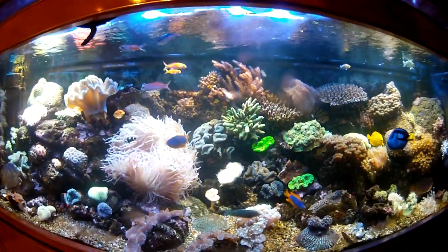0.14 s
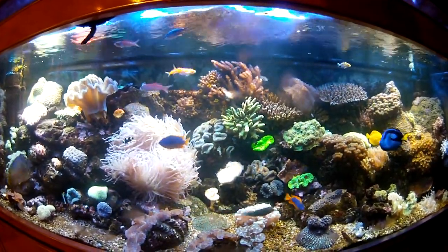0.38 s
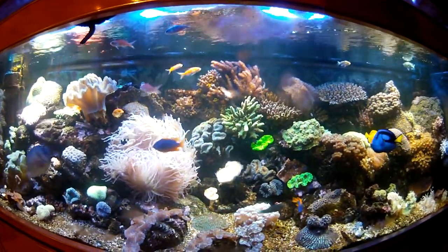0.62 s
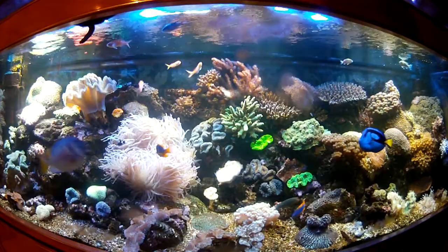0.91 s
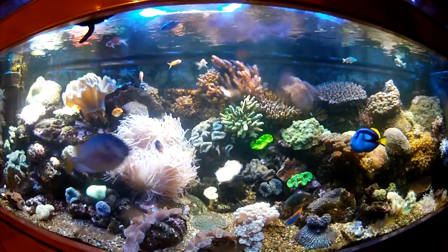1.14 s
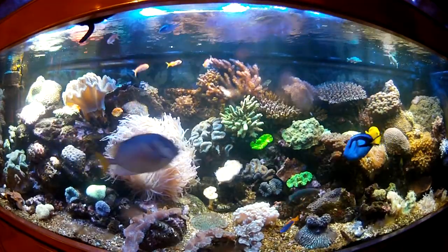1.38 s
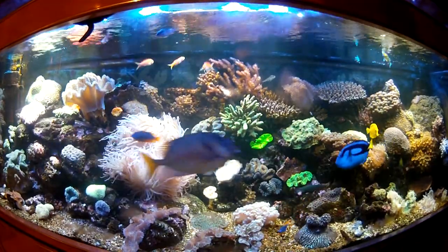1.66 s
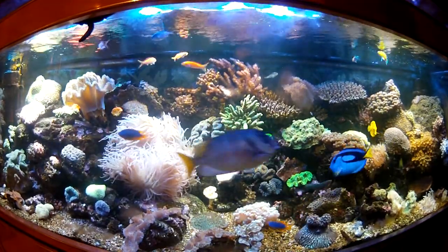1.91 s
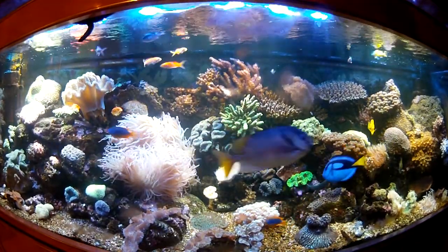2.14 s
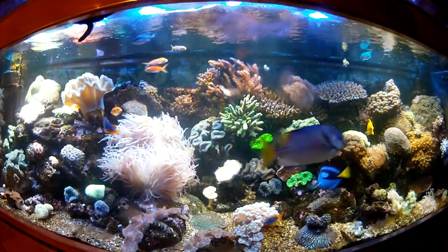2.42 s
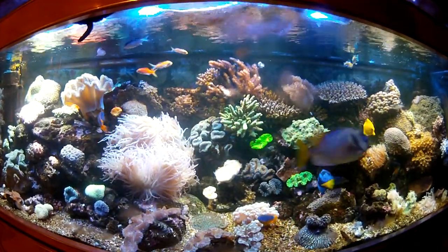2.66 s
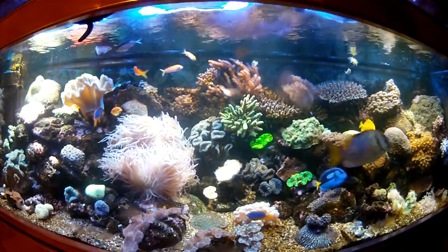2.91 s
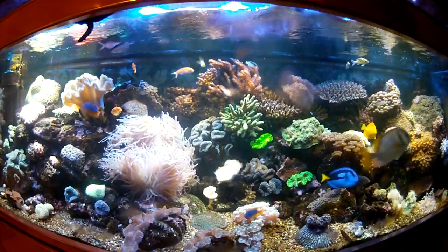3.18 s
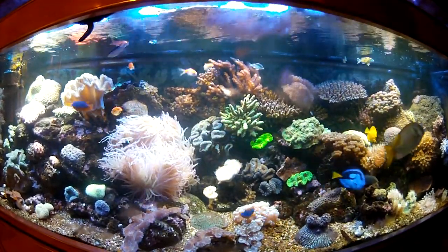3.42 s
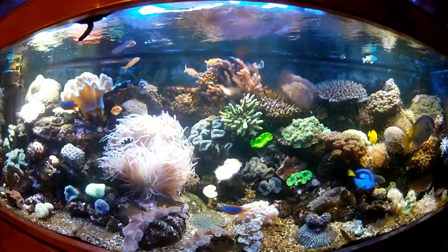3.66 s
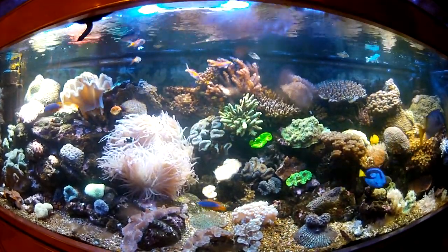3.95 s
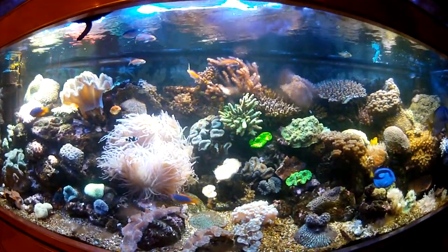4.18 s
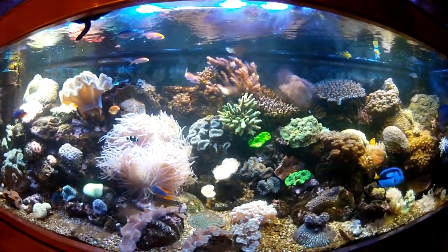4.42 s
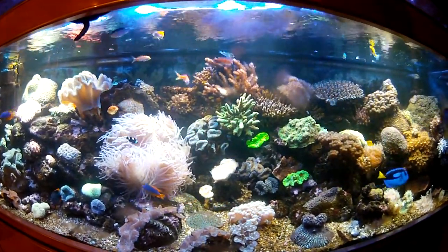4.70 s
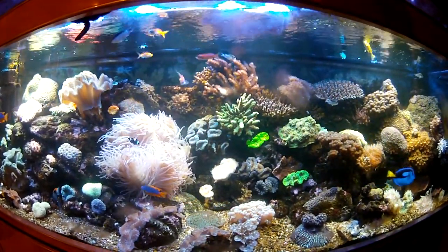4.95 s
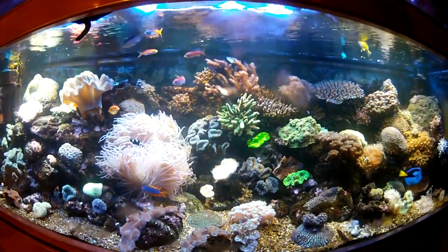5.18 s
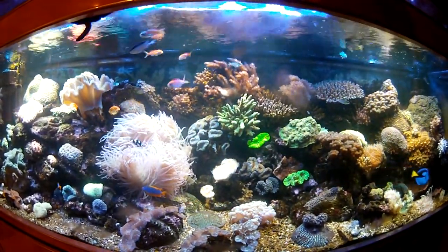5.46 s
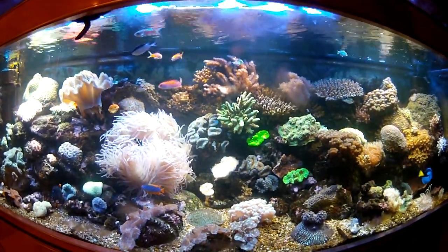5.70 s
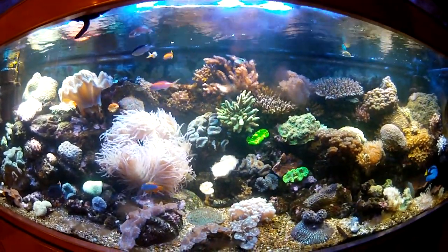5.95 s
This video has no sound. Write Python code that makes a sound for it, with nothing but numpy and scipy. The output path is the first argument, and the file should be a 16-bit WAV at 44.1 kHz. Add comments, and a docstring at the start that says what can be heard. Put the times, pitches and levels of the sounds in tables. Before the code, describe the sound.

A quiet indoor room with a large reef tank. Throughout, mains motors hum on steady low tones, with thin faint whines, a soft hiss of water flow and slow, deep room rumble. A slower wave pump drones first; at about 0.4 s it swaps within a tenth of a second to a pump with a strong low buzz near 143 Hz. Around 3.1 s the slower pump returns, its strongest tone near 246 Hz. Fish pass silently. From about 4.5 s a hand disturbs the camera: a low heave, then rumble, rustle and muffled knocks from 4.8 s, with a strong thump near 4.9 s. It eases around 5.2 s, then resumes from 5.4 s to the end at about 6.1 s with close, bassy lurches, dense dull knocks and tiny plastic ticks. The pumps swap again near 5.8 s, mostly covered. Mono, close, coarse small-camera sound with slightly gritty mirrored treble.

```python
"""A quiet room with a reef tank: mains motors hum, water flows, and two wave pumps take turns running.
Steady sines make the motors and pumps; shaped noise makes the water, the whines and the room rumble.
In the last two seconds a hand shifts the small camera: its body rumbles, rustles, heaves, knocks and ticks.
The camera samples its microphone coarsely and holds each sample, so the bass is mirrored in the treble."""
import sys
import numpy as np
from scipy import signal
from scipy.fft import rfft, irfft, next_fast_len
from scipy.io import wavfile

SR = 44100
rng = np.random.default_rng(int(sys.argv[2]) if len(sys.argv) > 2 else 0)


def master(y):
    """Save y as 16-bit WAV."""
    cut = np.clip(np.atleast_2d(y).T, -1, 1)
    pcm = np.round(cut * 32767)  # scale
    wavfile.write(sys.argv[1], SR, pcm.astype(np.int16))


def linear_from_db(decibels):
    """Turn decibels (scalar or array-like) into linear amplitude factors; 0 gives 1."""
    return 10 ** (np.asarray(decibels, float) / 20)


N = 268069  # length of the scene in samples


def drift(rate_hz):
    """A random curve of spread 1 that moves mostly slower than rate_hz."""
    # Made at every 40th sample; the first 2000 values let the filter settle.
    pole = np.exp(-80 * np.pi * rate_hz / SR)
    white = rng.standard_normal(N // 40 + 2002)
    slow = signal.lfilter([1], [1, -2 * pole, pole * pole], white)[2000:]
    return np.interp(np.arange(N) / 40, np.arange(len(slow)), slow / slow.std())


def noise(gain_at):
    """Noise of rms 1 whose gain is a given function of frequency."""
    size = next_fast_len(N)
    hz = np.arange(size // 2 + 1) * SR / size + 1  # the 1 avoids dividing by zero
    spectrum = rfft(rng.standard_normal(size)) * gain_at(hz)
    x = irfft(spectrum, size)[:N]
    return x / x.std()


def coloured(spectrum):
    """Noise of rms 1 with a tabled spectrum, joined by straight lines over log frequency."""
    hz, db = np.transpose(spectrum)
    return noise(lambda f: linear_from_db(np.interp(np.log(f), np.log(hz), db)))


def tones(lines, waver_db):
    """Sines whose level wavers slowly as load and water move."""
    t = np.arange(N) / SR
    out = np.zeros(N)
    for hz, db in lines:
        level = np.sqrt(2) * linear_from_db(db + waver_db * drift(2.6))  # root 2 turns rms into peak
        out += level * np.sin(2 * np.pi * (hz * t + rng.random()))
    return out


def room_rumble(corner_hz, fall):
    """The building and stand rumble in slow swells: deep noise that peaks near the lowest room modes."""
    swell_db = -51 + 1.5 * drift(4.3)
    return linear_from_db(swell_db) * noise(lambda f: (f / corner_hz) ** 2 / (1 + (f / corner_hz) ** fall))


def water_flow():
    """Water flow, room air and microphone hiss: broad noise whose level drifts gently."""
    # Loudness along the spectrum, relative: pitch_hz, level_db (per Hz)
    flow_spectrum = [(60, -34.5), (110, -1), (165, -16), (292, -7.5), (318, -16), (370, -8.5), (720, -10.5),
                     (790, -14.5), (985, -20.5), (1080, -17.5), (1240, -18), (1290, -24), (4900, -31.5),
                     (6000, -36)]
    level_db = -56.5 + .5 * drift(1.3)
    return linear_from_db(level_db) * coloured(flow_spectrum)


def motor_hum():
    """Steady motors and a filter pump sound as sines, some at multiples of the mains frequency."""
    # Motor tones: pitch_hz, level_db (rms)
    hum_tones = [(50, -62), (100.05, -60), (150, -72), (200.1, -61), (300.1, -60.5), (350.2, -77),
                 (500.2, -72), (506.8, -72.5), (522.1, -71), (559.2, -66.5), (596.7, -75), (668.6, -76),
                 (709.6, -79)]
    return tones(hum_tones, waver_db=.6)


def whines():
    """Fans and impellers whine: noise passes through narrow resonances."""
    # Whines: pitch_hz, width_hz (between the half-gain points), level_db (rms)
    whine_bands = [(402, 5, -69), (694, 5, -76), (918, 20, -81), (1027, 10, -77), (1134, 10, -78),
                   (1226, 8, -84), (1243, 8, -83), (1340, 6, -87)]
    out = np.zeros(N)
    for hz, width, db in whine_bands:
        out += linear_from_db(db) * noise(lambda f: 1 / (1 + (2 * (f - hz) / width) ** 2))
    return out


def wave_pumps(waver_db):
    """Two pumps, each a set of sines, swap over: one runs down while the other starts."""
    # Tones of each pump while it runs: pitch_hz, level_db (rms)
    fast_tones = [(143.1, -51), (243.1, -68), (286.2, -64), (428.8, -73), (695, -71.5)]
    slow_tones = [(122.8, -66), (245.9, -54.5), (368.8, -62.5), (691, -74), (737.4, -76)]
    # Middle of each swap, the slow pump running first: time_s
    swap_times = [.42, 3.135, 5.84]
    swap_s = 0.085  # length of each swap
    t = np.arange(N) / SR
    fast_on = np.zeros(N)
    for k, s in enumerate(swap_times):
        fast_on += (-1) ** k * np.clip((t - s) / swap_s + .5, 0, 1)
    return fast_on * tones(fast_tones, waver_db) + (1 - fast_on) * tones(slow_tones, waver_db)


def grip_rumble(grip_db):
    """The grip shakes the camera body: lumpy deep noise that follows the hand."""
    # Loudness along the spectrum, relative: pitch_hz, level_db (per Hz)
    rumble_spectrum = [(15, -32), (25, 0), (80, -6.5), (238, -23), (509, -33.5), (659, -38), (1200, -50),
                       (1560, -72), (2640, -120)]
    return linear_from_db(grip_db + 2.5 * drift(15)) * coloured(rumble_spectrum)


def skin_rustle(grip_db):
    """Skin rustles on the case: faint, quickly flickering noise that follows the hand."""
    low_hz, high_hz = 900, 4500
    level_db = grip_db - 44 + 6.5 * drift(27)
    return linear_from_db(level_db) * noise(lambda f: 1 / (1 + (low_hz / f) ** 2 + (f / high_hz) ** 2))


def heaves():
    """The mount swings unevenly and lopsidedly under a bell envelope for each heave."""
    # Heaves of the camera body on its mount: middle_s, peak_db, length_ms (between half-height points)
    heave_events = [(4.517, -27, 17.6), (4.771, -29, 61), (4.9027, -33, 14), (5.062, -36, 24),
                    (5.374, -39, 24), (5.505, -26, 23), (5.598, -27.5, 79), (5.667, -23.5, 14),
                    (5.712, -18, 24), (5.767, -20, 40), (5.835, -26, 34), (5.907, -20.5, 23),
                    (6.008, -27, 23), (6.047, -21.5, 5.8), (6.076, -18, 7.6)]
    mount_hz, wobble, overtone_db = 51.54, 0.2, -10  # wobble: unsteady share of the pitch
    t = np.arange(N) / SR
    envelope = np.zeros(N)
    for s, db, ms in heave_events:
        envelope += linear_from_db(db) * 2 ** (-((t - s) * 2000 / ms) ** 2)
    phase = 2 * np.pi * np.cumsum(mount_hz * np.exp(wobble * drift(25.26))) / SR
    # An overtone at twice the pitch makes the swing lopsided.
    overtone = linear_from_db(overtone_db + 2.3 * drift(22)) * np.cos(2 * phase + 2 * drift(14))
    return envelope * (np.cos(phase) + overtone)


def knocks(spread, rise_cycles):
    """A bending wave runs through the case: highs arrive first, so the pitch falls within each knock."""
    # Dull knocks on the case: start_s, level_db (before rise, decay and dulling), first_pitch_hz
    knock_events = [(4.782, -28, 282), (4.8317, -31.5, 390), (4.882, -33, 354), (4.9395, -15, 335),
                    (5.4596, -18.5, 217), (5.485, -22, 276), (5.606, -17, 346), (5.6852, -24.5, 414),
                    (5.6872, -15.5, 360), (5.721, -30.5, 300), (5.7381, -23, 560), (5.742, -20.5, 323),
                    (5.8028, -18.5, 213), (5.95, -23.5, 287), (5.961, -20.5, 257), (6.0213, -20.5, 350),
                    (6.0321, -16.5, 206)]
    decay_s = 0.006
    softness = 3.8  # soft fingers dull a knock above this multiple of its first pitch
    out = np.zeros(N)
    t = np.arange(round(.08 * SR)) / SR
    for s, db, hz in knock_events:
        sign = rng.choice([-1, 1])
        swing = np.sin(2 * np.pi * spread * np.log(1 + hz * t / spread))
        rise = 1 - np.exp(-(t * hz / rise_cycles) ** 2)
        hit = sign * linear_from_db(db) * rise * np.exp(-t / decay_s) * swing
        soft = signal.butter(3, softness * hz, fs=SR, output="sos")
        at = round(s * SR)
        out[at:at + len(t)] += signal.sosfilt(soft, hit)[:N - at]
    return out


def ticks():
    """Plastic joints tick: a few swings of a high tone under a very short bell envelope."""
    # Ticks: middle_s, peak_db, pitch_hz
    tick_events = [(4.8525, -47, 2500), (5.4607, -46.5, 3700), (5.4882, -45.5, 4300), (5.4897, -46, 3600),
                   (5.6325, -52, 3300), (5.719, -54, 3600), (5.7752, -52, 4000), (6.033, -54, 3900),
                   (6.0456, -54, 3500), (6.0516, -50, 4050), (6.0589, -48, 4000), (6.0612, -53, 4100)]
    ms = .6  # length between the half-height points
    out = np.zeros(N)
    for s, db, hz in tick_events:
        first, last = round((s - ms / 500) * SR), round((s + ms / 500) * SR)
        near = np.arange(first, min(last, N))
        t = near / SR - s
        bell = linear_from_db(db) * 2 ** (-(t * 2000 / ms) ** 2)
        out[near] += bell * np.cos(2 * np.pi * (rng.random() + hz * t))
    return out


def hand():
    """A hand moves the camera: its grip drives rumble and rustle, with heaves, knocks and ticks on top."""
    # Strength of the grip: time_s, level_db (of the rumble)
    grip_curve = [(4.2, -48), (4.712, -50), (4.884, -38.5), (5.02, -46), (5.208, -57), (5.424, -43.5),
                  (5.616, -37), (5.696, -43), (5.816, -34), (6.079, -38)]
    s, db = np.transpose([(4.1, -90), *grip_curve])  # barely there before the hand arrives
    grip_db = np.interp(np.arange(N) / SR, s, db)
    body = grip_rumble(grip_db) + skin_rustle(grip_db)
    return body + heaves() + knocks(spread=0.99, rise_cycles=0.27) + ticks()


def scene():
    """Tank and room sounds plus the hand, as one channel."""
    room = room_rumble(corner_hz=35.3, fall=3.61)
    tank = water_flow() + motor_hum() + whines() + wave_pumps(waver_db=.4)
    return (room + tank + hand())[None]


def top_cut(x):
    """Nothing passes above the cut-off."""
    return signal.sosfilt(signal.butter(12, 15330, fs=SR, output="sos"), x)


def record(dry):
    """Low-passed, sampled at the camera rate, each sample repeated: images appear around that rate."""
    camera_sr, hold = 12000, 4  # samples a second, repeats of each sample
    low_pass = signal.butter(8, 5770, fs=SR, output="sos")
    smooth = signal.sosfilt(low_pass, dry)
    coarse = signal.resample_poly(smooth, camera_sr, SR, axis=1, window=("kaiser", 3))
    stairs = np.repeat(coarse, hold, axis=1)
    held = signal.resample_poly(stairs, SR, camera_sr * hold, axis=1)
    mix = np.pad(held, ((0, 0), (0, 8)), "edge")[:, :N]
    return top_cut(mix)


dry = scene()
out = record(dry)
master(out)
```